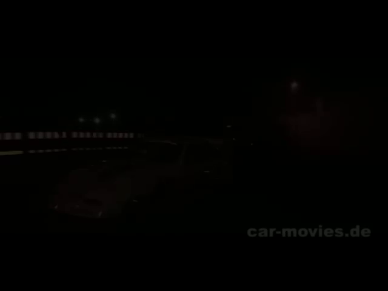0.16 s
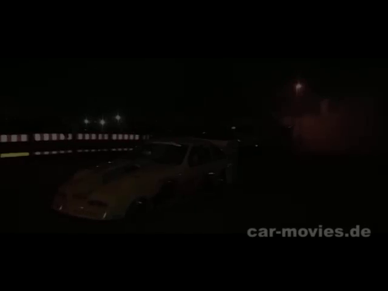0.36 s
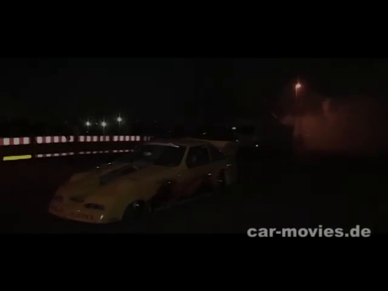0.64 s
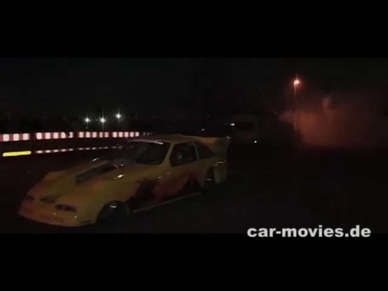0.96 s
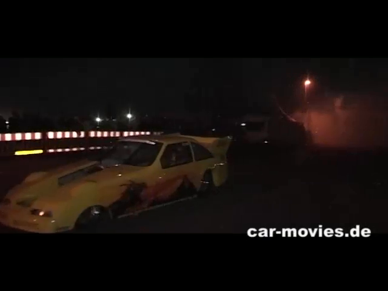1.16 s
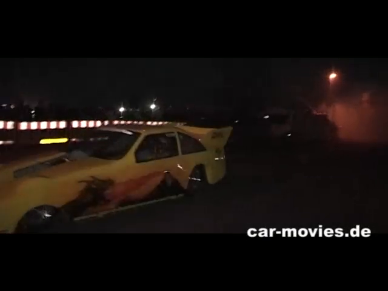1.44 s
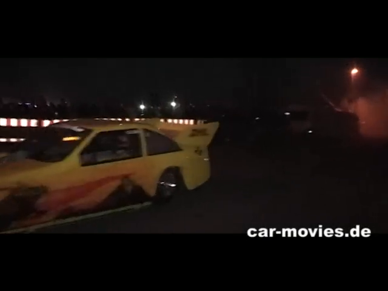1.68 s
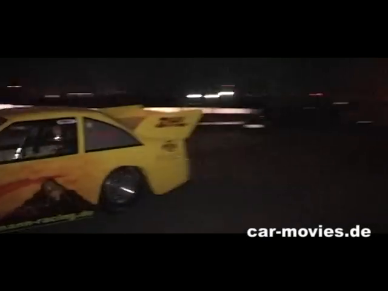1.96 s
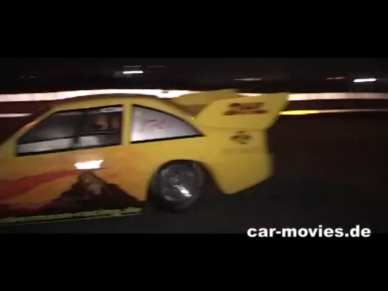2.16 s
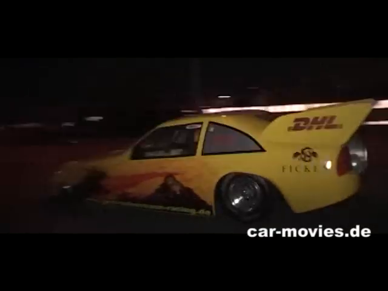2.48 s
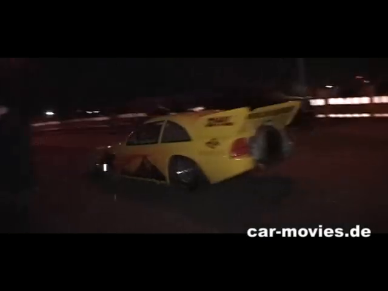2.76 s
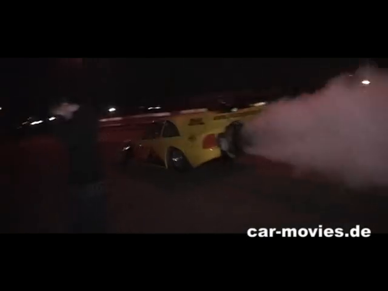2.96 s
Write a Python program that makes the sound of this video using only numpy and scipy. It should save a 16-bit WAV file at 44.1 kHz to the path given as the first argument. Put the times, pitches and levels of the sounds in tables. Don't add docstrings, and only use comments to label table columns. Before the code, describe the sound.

A jet engine on a drag car fades in with a piercing turbine whine and rushing air, then passes and becomes a rough, gusting exhaust roar; close outdoors at night, overloaded camcorder microphone.

```python
import sys
import numpy as np
from scipy import signal
from scipy.fft import rfft, irfft
from scipy.io import wavfile
from scipy.ndimage import uniform_filter1d

SR = 44100
rng = np.random.default_rng(int(sys.argv[2]) if len(sys.argv) > 2 else 0)


def bounce(signal):
    frames = np.transpose(np.atleast_2d(signal))
    limited = np.clip(frames, -1, 1)
    pcm = np.round(limited * 32767).astype(np.int16)
    wavfile.write(sys.argv[1], SR, pcm)


def undo_db(level):
    steps = np.asarray(level, float) / 20
    return 10 ** steps


N = 137592


def curve(table, col=1):
    points = np.array(table, float)
    return np.interp(np.arange(N) / SR, points[:, 0], points[:, col])


def unit(x):
    return x / np.std(x)


def walk(rate):
    hold = int(SR / rate)
    steps = np.repeat(rng.standard_normal(1000), hold)[:N + hold]
    smooth = uniform_filter1d(uniform_filter1d(steps, hold), hold)
    return unit(smooth[:N])


def narrow(carrier_phase, width_hz):
    b, a = signal.butter(1, width_hz / 2, fs=SR)
    i, q = signal.lfilter(b, a, rng.standard_normal((2, N)))
    return unit(i * np.cos(carrier_phase) + q * np.sin(carrier_phase))


def turbulence(spectrum, gust_db, flicker_db):
    hz = np.fft.rfftfreq(N, 1 / SR) + 1
    points = np.array(spectrum, float)
    shape_db = np.interp(np.log(hz), np.log(points[:, 0]), points[:, 1])
    shaped = rfft(rng.standard_normal(N)) * undo_db(shape_db)
    gust = gust_db * walk(8.2)
    out = 0
    for octave in range(10):
        distance = np.log2(hz / 2 ** (octave + 5))
        share = np.cos(np.clip(distance, -1, 1) * np.pi / 2) ** 2
        out = out + irfft(shaped * share, N) * undo_db(gust + flicker_db * walk(21.82))
    return unit(out)


# (time [s], speed [Hz])
SHAFT = [(0, 240.5), (.45, 240.8), (.85, 242.9), (1.2, 243.3), (1.6, 243.6), (2.0, 242.4), (2.3, 240),
         (2.6, 238.4), (3.12, 236.5)]
# (time [s], level [dB])
WHINE = [(0, 9), (.5, 4), (.56, 1), (.65, 5), (.99, 6.5), (1.03, 3), (1.38, 3.5), (1.455, 6.5), (1.5, 3.5),
         (1.59, 2.5), (1.62, 11), (1.66, 7), (2.02, 3), (2.08, -3.5), (2.11, 8), (2.16, -0.5), (2.42, -2),
         (2.7, -11.5)]
# (time [s], level [dB])
SCATTER = [(0, -9), (.5, -5), (1.0, -3), (2.0, -2.5), (2.3, 3), (3.12, 4)]
# (shaft order [-], level under the whine [dB])
ORDER_TONES = [(1, -13), (4, -24), (8, -26), (10, -17), (11, -25), (13, -18), (14, -22), (16, -25),
               (17, -26), (18, -25), (20, -25), (23, -28), (25, -25), (48, -34)]
# (time [s], level [dB])
DUCT = [
    (0, -3),
    (.35, -2),
    (.9, -1),
    (1.15, 2),
    (1.4, 0.5),
    (1.7, 0),
    (2.0, -2.5),
    (2.3, -10),
    (3.12, -14),
]


def compressor():
    blades = 24
    turn = 2 * np.pi * np.cumsum(curve(SHAFT) * (1 + 0.00078 * walk(14))) / SR
    blade_phase = blades * turn
    shimmer_db = np.clip(0.9 + curve(TAIL) / 5, 0.9, 3)
    shimmer = undo_db(curve(WHINE) + shimmer_db * walk(34.94) + 1.04 * walk(110))
    whine = np.sqrt(2) * np.sin(blade_phase + 0.5 * walk(60) + 0.35 * walk(200))

    skirt = undo_db(curve(SCATTER)) * narrow(blade_phase, 110)
    haystack = undo_db(-6.5 + 3.5 * walk(21)) * narrow((blades + 0.3) * turn, 520)
    overtone = undo_db(-12) * narrow(2 * blade_phase, 1500)

    tones = 0
    for order, db in ORDER_TONES:
        wobble = (0.32 + 0.05 * order) * walk(24.98)
        tones = tones + undo_db(db + 3.4 * walk(11.8)) * np.sin(round(order) * turn + wobble)
    ring = undo_db(-14.5) * narrow(turn * 2369 / 243.4, 74)

    beam = shimmer * (whine + skirt + haystack + overtone) * undo_db(-2.0)
    return beam + undo_db(curve(DUCT) + 4.5) * (tones + ring)


# (frequency [Hz], spectrum level [dB])
INTAKE = [(30, -11), (100, -10), (230, -2.5), (450, -3), (950, -4.5), (1500, -11), (5000, -12.5),
          (16000, -74)]


def intake_rush():
    return undo_db(-0.5) * turbulence(INTAKE, gust_db=0.84, flicker_db=0.4)


# (time [s], roar level [dB], rumble level [dB])
TAIL = [
    (0, -16.5, -13),
    (1.8, -9, -5),
    (2.1, 2.5, 0),
    (2.25, 4, -2.5),
    (2.5, 12.5, 0.5),
    (2.75, 15.5, 2),
    (2.95, 9, 6),
    (3.04, 9.5, 7.5),
    (3.12, 9, 9.5),
]
# (frequency [Hz], spectrum level [dB])
EXHAUST = [(30, -14), (200, -13.5), (550, -2), (950, 1.5), (1400, -5.5), (2600, -5.5), (6000, -17),
           (16000, -31.5)]


def tailpipe_roar():
    return undo_db(curve(TAIL)) * turbulence(EXHAUST, gust_db=1.6, flicker_db=1.15)


# (frequency [Hz], spectrum level [dB])
RUMBLE = [(30, -29), (110, -5), (220, 0), (400, -10), (1000, -31), (16000, -79)]


def tailpipe_rumble():
    return undo_db(curve(TAIL, col=2)) * turbulence(RUMBLE, gust_db=1.3, flicker_db=0.95)


def scene():
    jet = compressor() + intake_rush() + tailpipe_roar() + tailpipe_rumble()
    return np.array([jet, jet])


def overdriven_input(x):
    knee, top, bottom = 2.6, 0.63, 0.58
    x = signal.resample_poly(x, 4, 1)
    rail = np.where(x > 0, top, bottom)
    clipped = rail * x / (1 + np.abs(x) ** knee) ** (1 / knee)
    x = signal.resample_poly(clipped, 1, 4)
    x = signal.lfilter(*signal.butter(1, 122, "high", fs=SR), x) + 0.015
    return x * undo_db(1.25) / (1 + (x / 0.72) ** 4) ** 0.28


def channel_mismatch(x, t):
    band = signal.filtfilt(*signal.butter(2, (5500, 6300), "band", fs=SR), x)
    side = (undo_db(1.02) - 1) / 2 * band
    return side * np.clip((2.5 - t) / 0.3, 0, 1)


# (start [s], end [s])
CUT_S = (2.9962, 3.0359)


def fade_and_cut(t):
    fade_start_s, fade_s, bend = 0.036, 0.81, 0.38
    u = np.clip((t - fade_start_s) / fade_s, 0, 1)
    sounding = (t < CUT_S[0]) | (t > CUT_S[1])
    return u * (1 + bend * (1 - u)) * sounding


def roll_off(x):
    return signal.sosfilt(signal.butter(12, 15910, fs=SR, output="sos"), x)


def record(dry):
    t = np.arange(N) / SR
    x = signal.lfilter(*signal.butter(2, 70, "high", fs=SR), dry[0]) * undo_db(-1.5)
    x = overdriven_input(x)
    side = channel_mismatch(x, t)
    mix = np.array([x + side, x - side]) * fade_and_cut(t)
    return roll_off(mix)


dry = scene()
out = record(dry)
bounce(out)
```